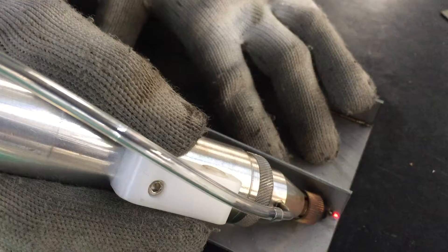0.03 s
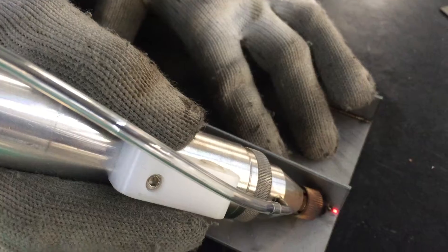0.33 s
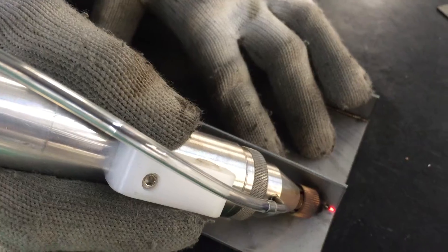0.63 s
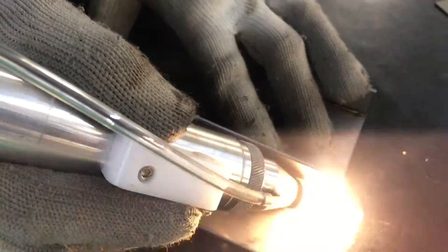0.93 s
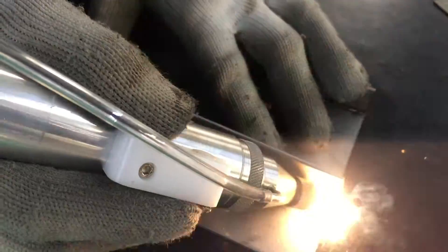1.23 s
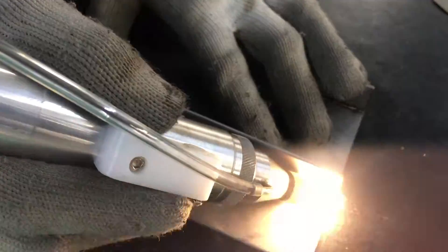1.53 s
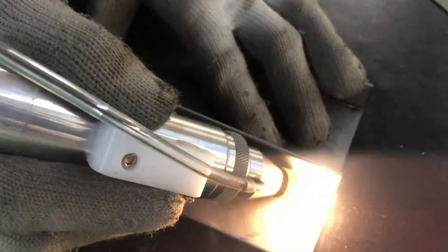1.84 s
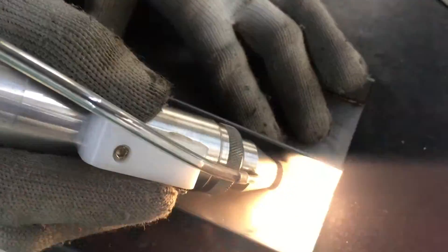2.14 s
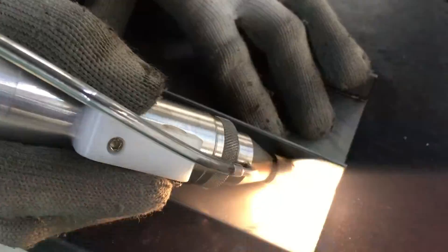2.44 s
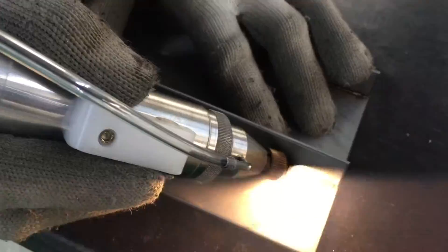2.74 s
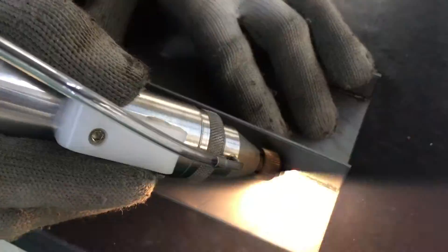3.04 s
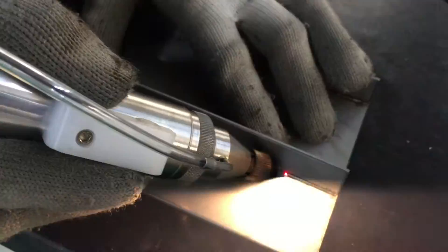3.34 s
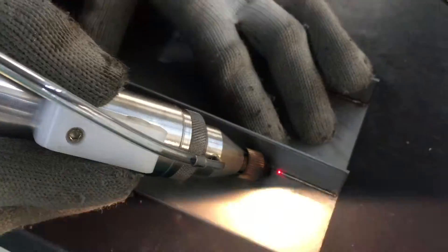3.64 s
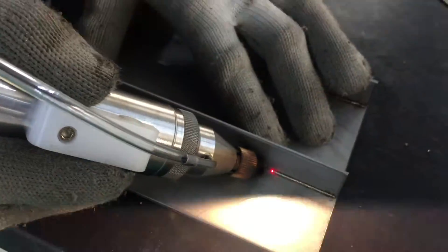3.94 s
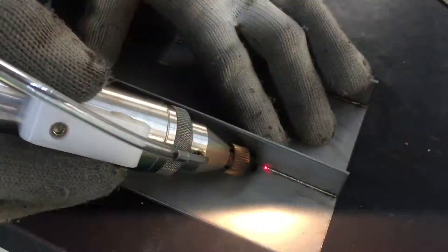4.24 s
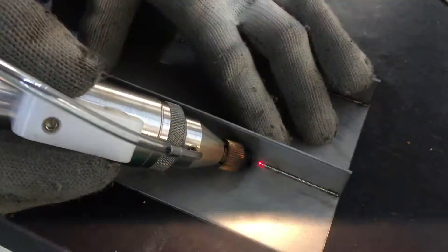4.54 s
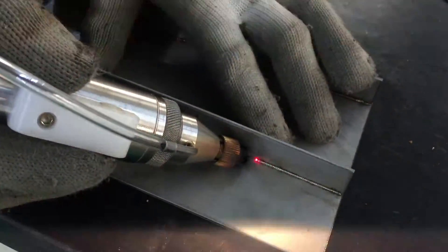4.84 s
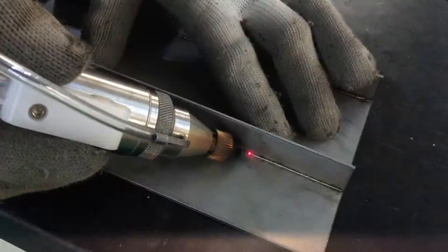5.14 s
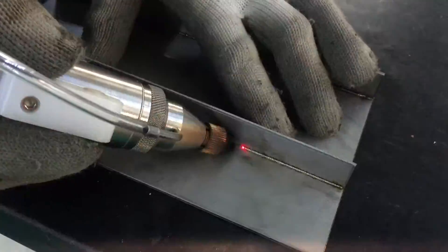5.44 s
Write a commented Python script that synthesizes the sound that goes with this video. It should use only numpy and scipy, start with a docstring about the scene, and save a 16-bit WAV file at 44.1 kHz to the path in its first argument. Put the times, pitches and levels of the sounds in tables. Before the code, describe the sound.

A handheld laser welder is heard up close, working on a thin steel sheet. First come quiet fan noise and hum, a light graze of the nozzle and a few dry trigger clicks. Gas rushes out, and at once a rapid, regular rattle of spitting pops begins. It runs without a break over the steady hiss, its hard peaks overloading the microphone a little, with the workshop faint behind.

```python
"""Handheld laser welding on thin steel

Close to the torch, in a workshop with a low mains hum. The nozzle grazes the sheet, the trigger clicks
and shielding gas rushes out; then the laser runs along the seam, firing twenty times a second.
Each shot boils metal for about a millisecond and ends in a pressure kick that overloads the microphone."""
import sys
import numpy as np
from scipy import signal
from scipy.fft import rfft, irfft
from scipy.io import wavfile
from scipy.ndimage import map_coordinates

SR = 44100
rng = np.random.default_rng(int(sys.argv[2]) if len(sys.argv) > 2 else 0)


def wav_out(sig):
    """Save sig, one row per channel (or a flat mono array), as 16-bit PCM at SR to the path in sys.argv[1]."""
    wavfile.write(sys.argv[1], SR, np.round(np.clip(np.atleast_2d(sig).T, -1, 1) * 32767).astype(np.int16))


N = 246078
TIME = np.arange(N) / SR
FIRST_SHOT_S, SHOT_PERIOD_S, SHOT_LENGTH_S = 1.00051, .0501212, .0011

# The colour of boiling metal. Each row: frequency in Hz, relative level in dB.
BOILING_SPECTRUM = [(200, -22), (900, -3.5), (1500, -12.5), (2500, -2), (3500, 1.5), (5000, -4),
                    (6000, -2.5), (9200, -4), (10400, -13), (12500, -2), (16000, -16)]


def from_db(db):
    """Decibels to gain."""
    return 10 ** (np.asarray(db) / 20)


def rms_one(x):
    """Scale to rms 1."""
    return x / np.sqrt(np.mean(x ** 2) + 1e-20)


def noise(spectrum, resonances=()):
    """Noise of rms 1 with a broad colour, lifted at each resonance."""
    hz = np.maximum(np.arange(N // 2 + 1) * SR / N, 1)
    points, levels = np.transpose(spectrum)
    db = np.interp(np.log(hz), np.log(points), levels)
    for centre, width, lift in resonances:
        db = db + lift / (1 + (2 * (hz - centre) / width) ** 2)
    return rms_one(irfft(rfft(rng.standard_normal(N)) * from_db(db), N))


def drift(rate):
    """A random wander through `rate` points a second, each of spread 1."""
    knots = rng.standard_normal(1000)
    return np.interp(TIME * rate, np.arange(len(knots)), knots)


def ring(drive, hz, t60):
    """A damped mode: a unit click sets a sine of height 1 ringing."""
    r, w = from_db(-60 / (t60 * SR)), 2 * np.pi * hz / SR
    return signal.lfilter([0, r * np.sin(w)], [1, -2 * r * np.cos(w), r * r], drive + 1e-18)


def click_at(s):
    """One unit click."""
    return (np.arange(N) == round(s * SR)).astype(float)


def impulses(times, spread_db):
    """One click at each time, of uneven strength."""
    out, at = np.zeros(N), np.round(times * SR).astype(int)
    at = at[(at >= 0) & (at < N)]
    out[at] = from_db(spread_db * rng.standard_normal(len(at)))
    return out


def ramp(start, length):
    """Rises from 0 to 1 over `length` seconds and stays there."""
    return np.clip((TIME - start) / length, 0, 1)


def dying(start, t60):
    """Holds at 1 until `start`, then dies away."""
    return from_db(-60 * np.maximum(TIME - start, 0) / t60)


def edge_nearness(fade_s=1.3):
    """1 while the torch is at the sheet's free edge, sinking towards 0 as it welds inward."""
    return np.exp(-np.maximum(TIME - FIRST_SHOT_S, 0) / fade_s)


def workshop(rush_db=-43, swell_s=.353, swell_width_s=.055):
    """Fans and transformers: a dull rush with wavering hum lines; the second line swells once."""
    # The rush of the fans. Each row: frequency in Hz, relative level in dB.
    rush_spectrum = [(35, -26), (50, -4), (75, -16), (160, -2), (380, -6.5), (500, -8), (1000, -11),
                     (1400, -19), (3000, -29), (4500, -40), (9000, -48.5), (11500, -54), (16000, -57)]
    # The room's resonances. Each row: centre in Hz, width in Hz, lift in dB.
    room_resonances = [(186, 52, 4.5), (780, 650, -0.5), (1960, 820, 4.9)]
    # Mains hum. Each row: frequency in Hz, rms level in dB before waver and drone are added.
    hum_lines = [(100, -44.5), (200, -44), (300, -52), (700, -60), (800, -59)]
    drone_db = -3.5 + 9.5 * np.exp(-((TIME - swell_s) / swell_width_s) ** 2)
    out = from_db(rush_db + .054 * drone_db) * noise(rush_spectrum, room_resonances)
    for k, (hz, db) in enumerate(hum_lines):
        level = from_db(db + .7 * drift(7) + (k == 1) * drone_db)
        out += np.sqrt(2) * level * np.sin(2 * np.pi * hz * TIME + .12 * drift(9))
    return out


def handling(rub_rise_s=.012, rub_t60=.62):
    """Dry clicks of grip and trigger; the nozzle taps and rubs the steel, which rings."""
    # Grip and trigger. Each row: start in seconds, relative level in dB, t60 in seconds.
    grip_clicks = [(.1973, -53, .03), (.8069, -48, .02), (.8673, -40, 0.018), (0.889, -30, 0.0098)]
    # The colour of clicks and rubs. Each row: frequency in Hz, relative level in dB.
    contact_spectrum = [(500, -11), (2000, 2), (5000, -3), (9000, -5), (16000, -13)]
    # The nozzle slides. Each row: start in seconds, length in seconds, relative level in dB.
    nozzle_rubs = [(.412, .08, -76), (.497, .075, -59.5)]
    # The nozzle knocks. Each row: time in seconds, relative level in dB.
    nozzle_taps = [(.4228, -64), (0.5102, -55), (0.561, -54)]
    # What rings as nozzle meets steel. Each row: frequency in Hz, gain in dB, t60 in seconds.
    graze_modes = [(2710, -5, 0.11), (3260, -10, .15), (3700, -10, .1), (4150, -10, .7), (4260, -10, .25),
                   (4300, -6, .14), (4720, -9, .08), (5340, -3, 0.066), (6100, -6, 0.05), (6280, -2, 0.06),
                   (9270, -10, .15), (9400, -11, .1)]
    clicks = sum(from_db(db - 6) * dying(s, t60) * (TIME >= s) for s, db, t60 in grip_clicks)
    rub_level = sum(from_db(db) * ramp(s, rub_rise_s) * dying(s + length, rub_t60)
                    for s, length, db in nozzle_rubs)
    rub = rub_level * noise(contact_spectrum)
    taps = sum(from_db(db - .5) * click_at(s) for s, db in nozzle_taps)
    contact = taps + from_db(-28) * rub
    ringing = sum(from_db(db) * ring(contact, hz, t60) for hz, db, t60 in graze_modes)
    return clicks * noise(contact_spectrum) + from_db(-1) * rub + ringing


def shielding_gas(valve_s=.97, jet_db=-36.5, flutter_db=1.62):
    """The valve opens with a surge and one sputter, then settles into a hollow hiss from the nozzle."""
    # The steady jet. Each row: frequency in Hz, relative level in dB.
    jet_spectrum = [(60, -11), (250, -21), (500, -33), (1000, 2.5), (1600, 3.5), (2900, 4), (4400, -7.5),
                    (5500, -9.5), (7800, -12), (9300, -14.5), (10800, -16), (16000, -20)]
    # The opening surge. Each row: frequency in Hz, relative level in dB.
    surge_spectrum = [(60, 6), (250, 11), (370, -1.5), (800, 4), (1300, -3), (1600, -34), (2100, -5),
                      (2600, -14), (3500, -4), (4500, -2.5), (8000, -5), (16000, -20)]
    # The nozzle's resonances. Each row: centre in Hz, width in Hz, lift in dB.
    nozzle_resonances = [(3450, 400, 2), (6350, 450, 6.5), (6950, 450, 6.5), (9960, 420, 9)]
    flow_db = jet_db + 3 * edge_nearness() + flutter_db * drift(70)  # louder blowing over the edge
    flow = ramp(valve_s, .021) * from_db(flow_db)
    jet = flow * (noise(jet_spectrum, nozzle_resonances) + gap_resonance())
    # Pressure stored in the hose escapes in a quick burst, then bleeds away.
    pressure = from_db(-23) * dying(valve_s, t60=.39) + from_db(-40) * dying(valve_s, t60=7.6)
    surge = ramp(valve_s, .0096) * pressure * noise(surge_spectrum, nozzle_resonances)
    sputter = from_db(-12) * ring(click_at(.991), hz=1900, t60=.009)
    return jet + surge + sputter


def gap_resonance(half_width_hz=190):
    """Turbulence rings between nozzle and steel: a hollow band that sinks as the torch moves inward."""
    edge = edge_nearness()
    hz, over_jet_db = 1838 + 130 * edge, 2 + 1.5 * edge
    lowpass = signal.butter(2, half_width_hz, fs=SR, output="sos")
    a, b = signal.sosfilt(lowpass, rng.standard_normal((2, N)))
    phase = 2 * np.pi * np.cumsum(hz) / SR
    return from_db(over_jet_db) * rms_one(a * np.cos(phase) + b * np.sin(phase))


def ignition(shots):
    """A small pop with a hard edge as the beam bites at the start of each shot."""
    bites = impulses(shots, spread_db=4)
    crack = from_db(-9) * ring(bites, hz=7000, t60=.00007)
    pop = from_db(-13) * ring(bites, hz=1590, t60=.012)
    return crack - pop


def vapour_spit(shots, spit_db=-5, jitter_s=.00004):
    """Metal boils while the beam is on, harder as the spot heats up."""
    age = np.arange(int(SHOT_LENGTH_S * SR)) / SR
    heating = from_db(-3 * (1 - age / SHOT_LENGTH_S) ** 2)
    starts = impulses(shots + jitter_s * rng.standard_normal(len(shots)), spread_db=4)
    return from_db(spit_db) * np.convolve(starts, heating)[:N] * noise(BOILING_SPECTRUM)


def keyhole_ring(shots, uneven_db=3.5, squeak_hz=7600, squeak_octaves=.236, squeak_db=-10):
    """The vapour cavity oscillates for a few cycles and its mouth squeaks, at new pitches every shot."""
    out, age = np.zeros(N), np.arange(int(SHOT_LENGTH_S * SR)) / SR
    swell = np.sqrt(np.sin(np.pi * age / SHOT_LENGTH_S))
    # Steady at first, the cavity rings lower and erratically once the torch is under way.
    moving = ramp(2.14, .49)
    hz, scatter_octaves, db = 3580 - 354 * moving, .029 + .171 * moving, -5 - .5 * moving
    chances = rng.standard_normal((len(shots), 3, 2))
    for at, (detune, strength, phase) in zip((shots * SR).astype(int), chances):
        pitches = np.array([hz[at], squeak_hz]) * 2 ** (detune * [scatter_octaves[at], squeak_octaves])
        gains = from_db(np.array([db[at], squeak_db]) + uneven_db * strength)
        tones = np.sin(2 * np.pi * (np.outer(age, pitches) + phase))
        out[at:at + len(age)] = swell * (tones @ gains)
    return out


def bounce(spit, bounce_db=-10):
    """The torch body throws each spit back; the slowly growing delay gives a shifting metallic colour."""
    delay_s = .000697 - .00019 * edge_nearness()
    return from_db(bounce_db) * map_coordinates(spit, [(TIME - delay_s) * SR], order=3)


def near_echoes(spit, echo_db, t60, dull_hz):
    """Nearby surfaces scatter each spit into a short, duller tail."""
    fade = from_db(-120 / (t60 * SR))  # power falls by the square of the gain
    power = signal.lfilter([1 - fade], [1, -fade], spit ** 2 + 1e-18)
    dull = signal.sosfilt(signal.butter(1, dull_hz, fs=SR, output="sos"), noise(BOILING_SPECTRUM))
    return from_db(echo_db) * np.sqrt(power) * rms_one(dull)


def plume_kick(shots, cold_db=3.5):
    """The plume collapses as the beam stops: a snap that sinks into a thump, weaker at the edge."""
    # The kick's ringing. Each row: frequency in Hz, gain in dB, t60 in seconds, signed share of thump_db.
    kick_modes = [(59.3, -7.5, 0.068, 1.0), (135, 2, 0.016, 1), (377, -2, 0.0066, -.45),
                  (1020, 11, 0.00093, 0), (2780, 3.5, 0.0022, 0.83)]
    cold_boost = from_db(cold_db * dying(FIRST_SHOT_S, t60=.5))  # cold metal kicks harder
    kicks = impulses(shots + SHOT_LENGTH_S, spread_db=.63) * cold_boost
    thump_db = -1.72 - 8 * edge_nearness()
    out = np.zeros(N)
    for k, (hz, db, t60, share) in enumerate(kick_modes):  # neighbouring modes swing opposite ways
        out -= (-1) ** k * ring(kicks * from_db(db + share * thump_db), hz, t60)
    return out


def sheet_ring():
    """The steel rings briefly after each kick, louder and a little higher at its free edge."""
    # The sheet's modes. Each row: frequency far from the edge in Hz, relative level in dB, t60 in seconds.
    sheet_modes = [(555, -12, 0.013), (1158, -9.5, 0.0068), (1920, -2, 0.0055)]
    edge = edge_nearness()
    sheet_db, sharpening = -1 + 7 * edge, 1 + .052 * edge
    age = np.maximum(TIME - (FIRST_SHOT_S + SHOT_LENGTH_S), 0) % SHOT_PERIOD_S
    out = np.zeros(N)
    for k, (hz, db, t60) in enumerate(sheet_modes):
        level = from_db(db + sheet_db - 60 * age / t60)
        out -= (-1) ** k * level * np.sin(2 * np.pi * hz * sharpening * age)
    return out


def scene():
    """The laser fires on a steady clock over gas and room."""
    shots = np.arange(FIRST_SHOT_S, N / SR, SHOT_PERIOD_S)
    spit = vapour_spit(shots) + keyhole_ring(shots)
    off_torch = near_echoes(spit, echo_db=-8, t60=.0081, dull_hz=14300)
    off_bench = near_echoes(spit, echo_db=-13, t60=.013, dull_hz=4900)
    reflections = bounce(spit) + off_torch + off_bench
    weld = ignition(shots) + spit + reflections + plume_kick(shots) + sheet_ring()
    return (weld + shielding_gas() + handling() + workshop())[None]


def record(dry, overload=.61, low_cut_hz=9, high_cut_hz=17200):
    """Sound starts after a moment; peaks are flattened, highest treble and deepest bass filtered away."""
    opening = ramp(.12, .003)
    clipped = overload * np.tanh(dry * opening / overload)
    low_cut = signal.sosfilt(signal.butter(1, low_cut_hz, "high", fs=SR, output="sos"), clipped)
    return signal.sosfiltfilt(signal.cheby2(8, 35, high_cut_hz, fs=SR, output="sos"), low_cut)


dry = scene()
out = record(dry)
wav_out(out)
```